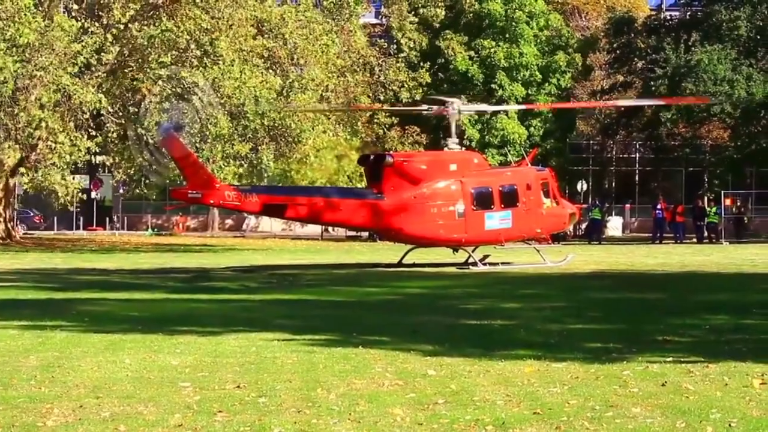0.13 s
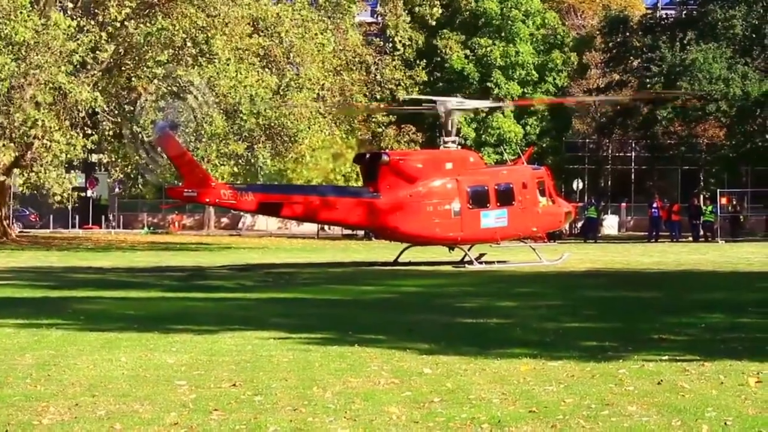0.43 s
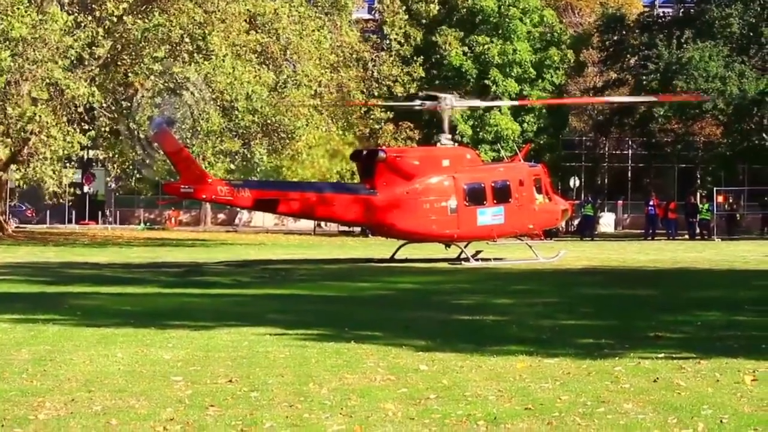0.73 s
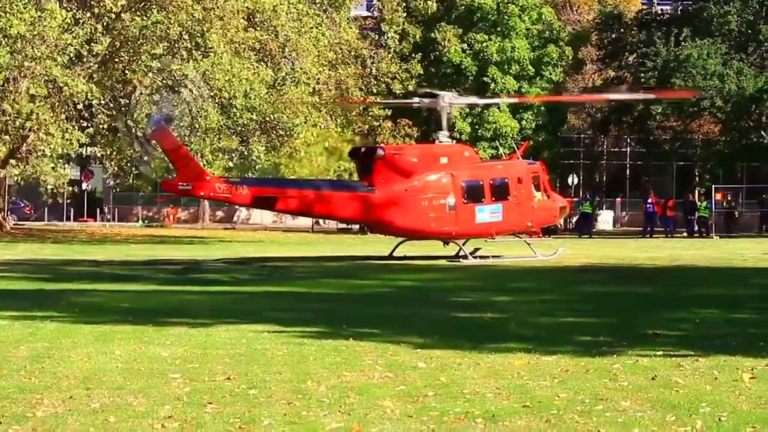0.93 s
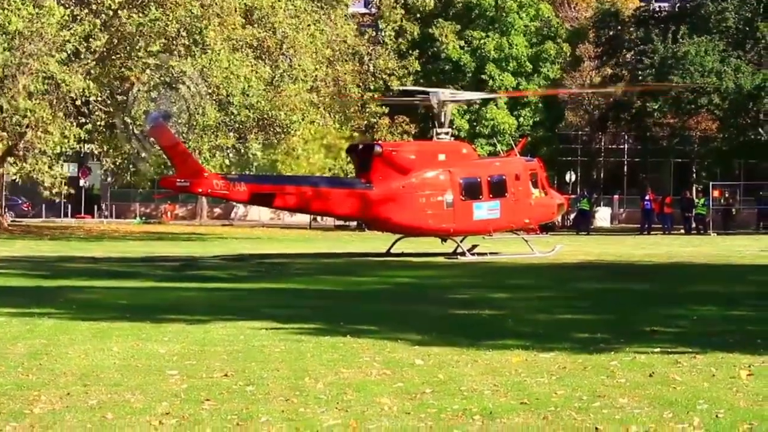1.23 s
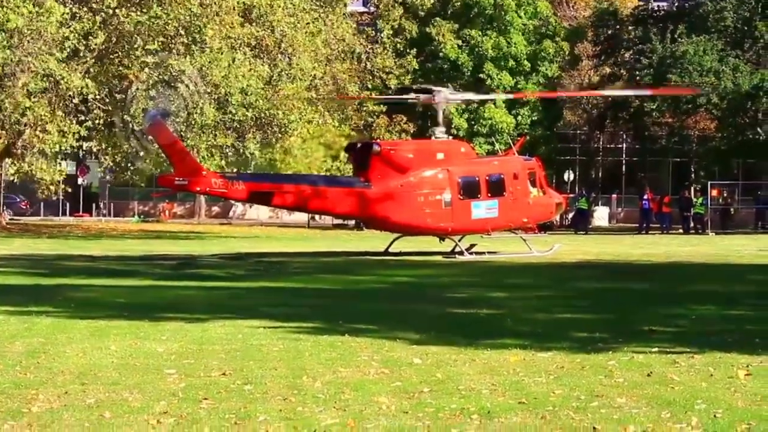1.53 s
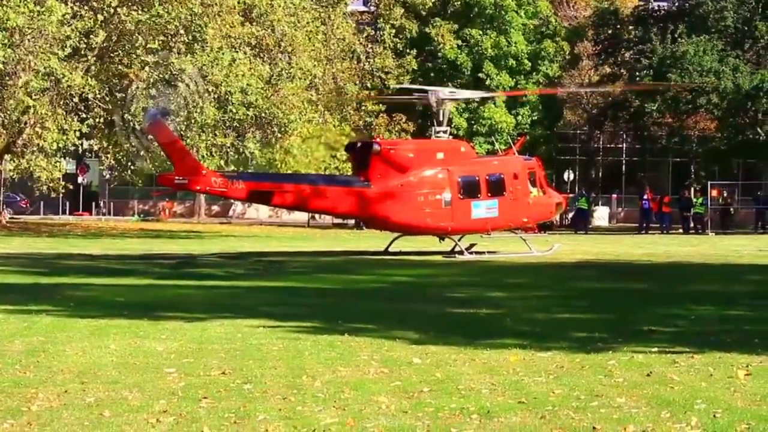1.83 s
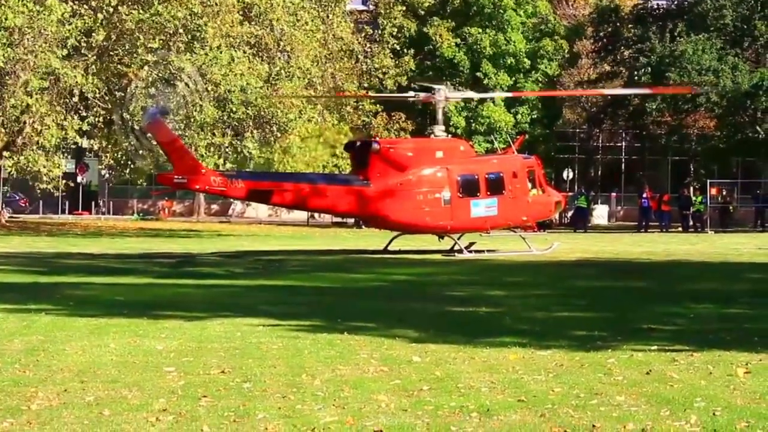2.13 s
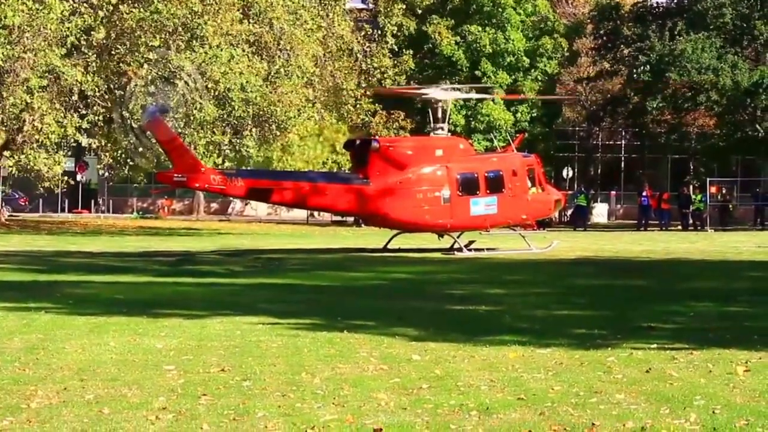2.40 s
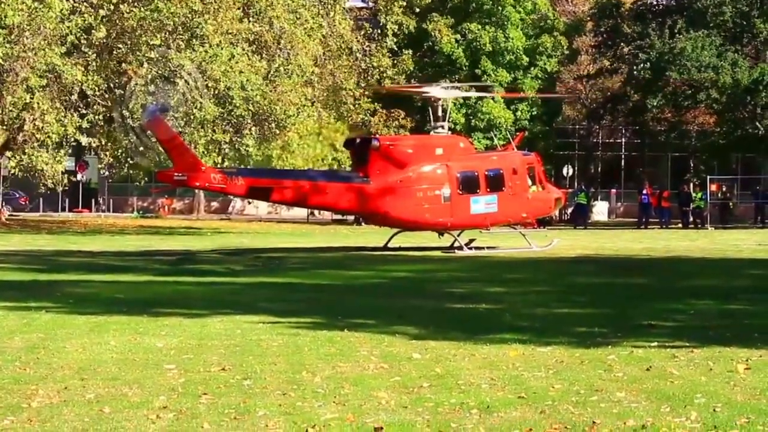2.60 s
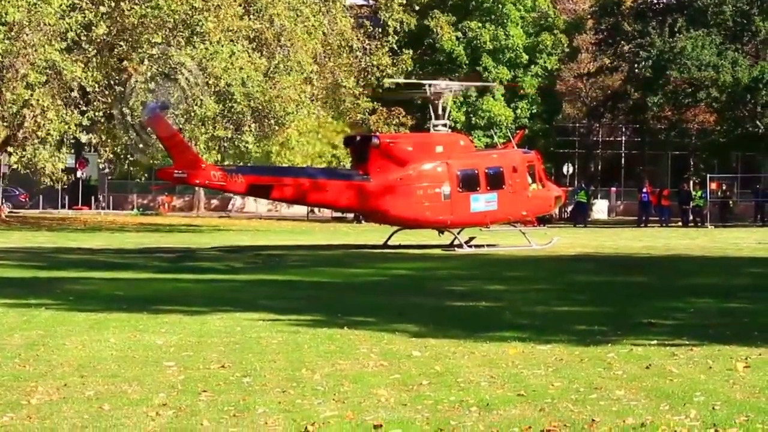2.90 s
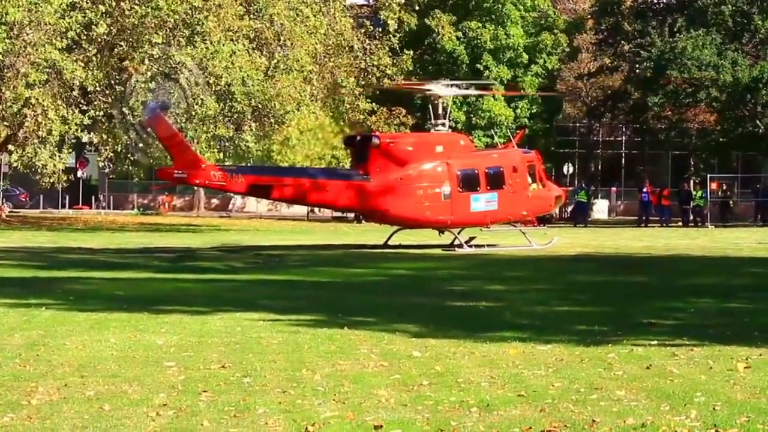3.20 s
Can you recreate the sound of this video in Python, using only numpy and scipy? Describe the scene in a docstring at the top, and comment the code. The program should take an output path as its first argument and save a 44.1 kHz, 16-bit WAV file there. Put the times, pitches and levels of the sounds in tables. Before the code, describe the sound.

Steady rapid helicopter blade chops with a raspy tail buzz, sharpest early, above engine roar and low downwash rumble, heard outdoors at moderate distance with faint tree reflections; a tiny dropout comes at the end.

```python
"""A two-blade turbine helicopter runs up, some way off. From the start each main blade pass gives a low push and
a burst of torn air; the tail rotor buzzes five times faster, its slap sharpest about 0.3 s in. A gear mesh
whines with sidebands over exhaust roar and downwash rumble, all noise through filters; trees answer the rotors.
At 3.3 s the level dips briefly, the beat skips ahead and the sound returns slightly louder."""
import sys
import numpy as np
from scipy import signal
from scipy.fft import rfft, irfft, next_fast_len
from scipy.io import wavfile
from scipy.ndimage import uniform_filter1d, map_coordinates

SR = 44100
rng = np.random.default_rng(int(sys.argv[2]) if len(sys.argv) > 2 else 0)


def store_wav(level_fs):
    """Save 16-bit WAV to argv[1]."""
    pcm = np.round(np.clip(np.atleast_2d(level_fs), -1, 1) * 32767)
    wavfile.write(sys.argv[1], SR, pcm.T.astype(np.int16))


def invert_db(level):
    """Linear amplitude ratio for a level in decibels (20 dB per decade), elementwise."""
    return 10 ** (np.asarray(level, dtype=float) / 20)


N = 147735
SPEEDUP_PER_S = .0018  # fractional rise of rotor and gear speed
DIP_S = 3.302


def unit(x):
    """Scale to rms 1."""
    return x / np.sqrt(np.mean(x ** 2) + 1e-20)


def curves(rows):
    """One value per sample for each column after the time."""
    s, *cols = np.transpose(rows)
    return [np.interp(np.arange(N) / SR, s, c) for c in cols]


def wobble(knots_per_s):
    """Smooth random curve through normal-distributed knots."""
    knots = rng.standard_normal(int(N * knots_per_s / SR) + 4)
    return map_coordinates(knots, [np.arange(N) * knots_per_s / SR])


def filtered(x, response):
    """x times a complex response of frequency, zero-padded."""
    m = next_fast_len(N + SR // 2)
    return irfft(rfft(x, m) * response(np.fft.rfftfreq(m, 1 / SR)), m)[:N]


def coloured(x, points):
    """x through (hz, rel_db) points on a log axis, rms 1."""
    f, db = np.transpose(points)
    return unit(filtered(x, lambda hz: invert_db(np.interp(np.log(hz + 1), np.log(f), db))))


def passes(rate_hz, first_s):
    """Per sample: number of the nearest blade pass and seconds from it, as the rotor speeds up."""
    skip_s = .013
    t = np.arange(N) / SR
    t = t + skip_s * (t > DIP_S)
    turns = rate_hz * (t - first_s + SPEEDUP_PER_S * t ** 2 / 2)
    nearest = np.round(turns)
    return nearest.astype(int) + 1, (turns - nearest) / rate_hz


def blade_push():
    """Low pressure pulse per main blade pass, with echoes off ground and hull."""
    rate_hz, first_s = 9.995, .0612
    push_db, scatter_db, width_ms = -15.5, 1, 2.52
    # echoes: delay_s, gain
    echoes = [(.006, -.6), (.011, -0.49)]
    k, since_s = passes(rate_hz, first_s)
    u = since_s / (width_ms / 1000)
    level = invert_db(push_db + scatter_db * rng.standard_normal(k.max() + 1)[k])
    push = level * (1 - 0.28 * u ** 2) * np.exp(-u ** 2 / 2)
    return filtered(push, lambda hz: 1 + sum(g * np.exp(-2j * np.pi * hz * s) for s, g in echoes))


def blade_swish():
    """Torn air: crackling noise in a dull and a bright band, swelling round each main blade pass."""
    swish_db, skirt_rel_db, skirt_ms = -4.5, -12, 13.6
    body_crackle_db, edge_crackle_db = 4, 2
    # main blade passes: time_s, swish_rel_db, spread_ms, edge_over_body_db
    blades = [(0.06, -8, 3.2, -8), (0.161, -11.5, 3.4, -8.5), (0.26, -11, 5, -6.5), (0.363, -11, 3.4, -5.5),
              (0.462, -12.5, 3.6, -5.6), (0.56, -9, 3.2, -10), (0.661, -8, 2.8, -9),
              (0.761, -12, 4.9, -4.5), (0.857, -10.6, 5.3, -7.0), (0.959, -8, 2.9, -9.0),
              (1.061, -14.5, 6.3, -5), (1.16, -12, 5, -8), (1.26, -13.5, 3.3, -3.5),
              (1.361, -10, 2.8, -5.5), (1.459, -12, 4.2, -4), (1.559, -8.5, 2.1, -5), (1.661, -13, 5.4, -6),
              (1.76, -13, 4.4, -2.5), (1.858, -11.5, 4.5, -6.5), (1.958, -12.5, 4.5, -7),
              (2.061, -12, 2.9, -6), (2.159, -14, 7, -4.5), (2.259, -12.5, 4.5, -4.5),
              (2.36, -11.5, 4.2, -8.5), (2.458, -12, 6.3, -8), (2.56, -13.5, 5.1, -5),
              (2.656, -12.5, 4.2, -6.2), (2.755, -10, 2.2, -5.5), (2.855, -10.5, 4.1, -6.0),
              (2.954, -13, 3.3, -3), (3.054, -9.5, 2.9, -7), (3.153, -10, 3, -8), (3.253, -10, 3.1, -4.8),
              (3.337, -14.5, 4.8, -4.5)]
    # dull band of the torn air: hz, rel_db
    body_colour = [(60, -34), (150, 2), (300, -5.5), (450, -3.5), (700, 1), (1100, -1.5), (1600, -11.5),
                   (2200, -40), (4000, -48)]
    # bright band of the torn air: hz, rel_db
    edge_colour = [(700, -39), (1600, 1.5), (2400, 2.5), (3400, -0.5), (4900, -14), (7000, -23),
                   (10000, -31), (14300, -36), (15200, -72)]
    s, body_db, spread_ms, bright_db = np.transpose(blades)[:, :, None]
    dt_ms = (np.arange(N) / SR - s) * 1000
    core = np.exp(-(dt_ms / spread_ms) ** 2 / 4)
    swell = core + invert_db(skirt_rel_db) * np.exp(-np.abs(dt_ms) / skirt_ms)
    noise, eddies = rng.standard_normal(N), wobble(700)

    def band(colour, level_db, crackle_db):
        """One band of torn air, each burst held to its level."""
        air = coloured(noise * invert_db(crackle_db * eddies), colour)
        # cancels the chance energy of the noise under each swell
        steady = np.sqrt((swell ** 2).sum(1) / ((swell * air) ** 2).sum(1))[:, None]
        envelope = (invert_db(level_db) * steady * swell).sum(0)
        return invert_db(swish_db) * envelope * air

    body = band(body_colour, body_db, body_crackle_db)
    edge = band(edge_colour, body_db + bright_db, edge_crackle_db)
    return body + edge


def main_rotor():
    """A pressure push per pass, and the torn air round it."""
    return blade_push() + blade_swish()


def tail_rotor():
    """Suction pulse per pass, then a slap of about one cycle as the blade cuts the main rotor's wake."""
    rate_hz, first_s = 51.24, .0138
    waver_db, grows_db_per_s = 1, 0.63
    slap_lag_s, slap_hz, slap_ms = .0046, 790, .62
    jitter_s, scatter_db, pitch_scatter = .0002, 2.5, .15  # pitch scatter in natural-log units
    # suction pulse as orders of the blade rate: multiple, mid_run_rms_db
    orders = [(1, -32), (2, -36.5), (3, -33.5), (4, -36), (5, -41), (6, -41), (7, -46), (8, -45), (9, -43)]
    # slap: time_s, level_db
    slap_level = [(0, -14), (.1, -11), (.3, -8.5), (.45, -10), (.65, -14), (1, -15), (1.4, -17), (1.8, -17),
                  (2.3, -17), (2.8, -17), (3.35, -15)]
    k, since_s = passes(rate_hz, first_s)
    time_luck, pitch_luck, level_luck = rng.standard_normal((k.max() + 1, 3))[k].T

    suction = 0
    for n, db in orders:
        level = np.sqrt(2) * invert_db(db + waver_db * wobble(4.85))
        suction = suction - level * np.cos(2 * np.pi * n * rate_hz * since_s)
    suction = suction * invert_db(grows_db_per_s * (np.arange(N) - N / 2) / SR)

    t = since_s - slap_lag_s - jitter_s * time_luck
    slap_db, = curves(slap_level)
    cycle = np.sin(2 * np.pi * slap_hz * np.exp(pitch_scatter * pitch_luck) * t)
    window = np.exp(-(t / (slap_ms / 1000)) ** 2 / 2)
    slap = invert_db(slap_db + scatter_db * level_luck) * cycle * window
    return suction - slap


def gearbox():
    """Mesh tone, overtone and shaft sidebands rising with the rotors, wavering in stirred air, plus hiss."""
    mesh_hz, sideband_hz, waver_db = 1736.5, 55, 2
    # mesh loudness: time_s, level_db
    mesh_level = [(0, -41), (.2, -36.5), (.45, -33.5), (.65, -38.5), (.9, -35), (1.05, -33), (1.2, -29),
                  (1.28, -36.5), (1.6, -33), (1.9, -33), (2.1, -28), (2.35, -31), (2.55, -34.5), (2.7, -31),
                  (2.85, -42), (3.05, -31), (3.2, -31.5), (3.35, -32)]
    # partials: mesh_multiple, sideband_number, rel_db, unsteadiness_hz
    partials = [(1, 0, -2, 2.55), (1, -1, -4.5, 3.65), (1, 1, -6, 4.1), (1, -2, -10.5, 8.5),
                (1, 2, -11.5, 3.5), (2, 0, -7, 13.87)]
    # narrow hiss round the overtones: mesh_multiple, half_width_hz, rms_db
    grit_bands = [(2, 150, -37.5), (3, 74, -54)]
    hz = mesh_hz * (1 + SPEEDUP_PER_S * np.arange(N) / SR)
    mesh_db, = curves(mesh_level)

    tones = 0
    for n, side, rel_db, loose_hz in partials:
        level = invert_db(rel_db + waver_db * wobble(14))
        partial_hz = n * hz + side * sideband_hz + loose_hz * wobble(30)
        tones = tones + level * np.sin(2 * np.pi * np.cumsum(partial_hz) / SR)

    grit = 0
    for n, width_hz, db in grit_bands:
        hiss = filtered(rng.standard_normal(N), lambda f: 1 / (1 + ((f - n * hz.mean()) / width_hz) ** 2))
        grit = grit + invert_db(db) * unit(hiss)
    return np.sqrt(2) * invert_db(mesh_db) * tones + grit


def rush(colour, level, patchy_db):
    """Turbulent noise, slightly grainy in time and patchy in time and frequency."""
    grainy = rng.standard_normal(N) * invert_db(1.1 * wobble(300))
    z = signal.stft(grainy, nperseg=512)[2]
    field = uniform_filter1d(rng.standard_normal(z.shape), size=8, axis=0)
    field = uniform_filter1d(field, size=8, axis=1)
    x = signal.istft(z * invert_db(patchy_db * unit(field)), nperseg=512)[1][:N]
    level_db, = curves(level)
    return invert_db(level_db + .3 * wobble(2.4) + 0.5 * wobble(24.73)) * coloured(x, colour)


def exhaust():
    """Broadband turbine roar."""
    # spectrum: hz, rel_db
    roar_colour = [(200, -25), (300, -16), (450, -5), (700, -5), (1100, -5.5), (1500, -8), (2200, -10.5),
                   (3000, -12), (3500, -15), (4100, -21.5), (6000, -30.5), (8200, -32), (10000, -45.5),
                   (14300, -61), (15200, -85)]
    # loudness: time_s, level_db
    roar_level = [(0, -25.5), (.6, -25.5), (1.2, -25), (1.8, -25), (2.4, -23.5), (3, -25.5), (3.35, -25.5)]
    return rush(roar_colour, roar_level, patchy_db=1.16)


def downwash():
    """Low rumble of the air the rotor drives down."""
    # spectrum: hz, rel_db
    wash_colour = [(12, -30), (25, -4), (50, -3.5), (110, -3.5), (160, 1.5), (230, -4.5), (330, -9),
                   (500, -34), (1000, -73)]
    # loudness: time_s, level_db
    wash_level = [(0, -27.5), (.6, -30), (1.2, -29), (1.8, -27), (2.2, -26), (2.6, -26), (3, -29.5),
                  (3.35, -24.5)]
    return rush(wash_colour, wash_level, patchy_db=2.5)


def trees(x):
    """Dull, diffuse answer from the tree line: x convolved with decaying smoothed noise."""
    answer_db, t60_s, delay_s = -16.5, 0.24, .008
    t = np.arange(SR // 3) / SR
    tail = uniform_filter1d(rng.standard_normal(len(t)), size=5)
    tail = tail * invert_db(-60 * t / t60_s) * (t > delay_s)
    return invert_db(answer_db) * signal.fftconvolve(x, tail / np.linalg.norm(tail))[:N]


def scene():
    """All sources, with the brief dip near the end."""
    dip_fall_s, dip_rise_s, after_db = .0015, .006, 2
    rotors = main_rotor() + tail_rotor()
    mix = rotors + gearbox() + exhaust() + downwash() + trees(rotors)
    t = np.arange(N) / SR - DIP_S
    dip = 1 - np.exp(-np.abs(t) / np.where(t > 0, dip_rise_s, dip_fall_s))
    return (mix * dip * invert_db(after_db * (t > 0)))[None]


def roll_off(x):
    """The treble ends steeply here."""
    return signal.sosfilt(signal.butter(12, 15320, fs=SR, output="sos"), x)


def record(dry):
    """The microphone rolls off the deepest bass and rounds the highest peaks."""
    low_hz, clip_top, clip_hardness = 36.2, .85, 4
    x = filtered(dry[0], lambda hz: (1j * hz / (low_hz + 1j * hz)) ** 2)
    x = x / (1 + np.abs(x / clip_top) ** clip_hardness) ** (1 / clip_hardness)
    return roll_off(x[None])


dry = scene()
out = record(dry)
store_wav(out)
```